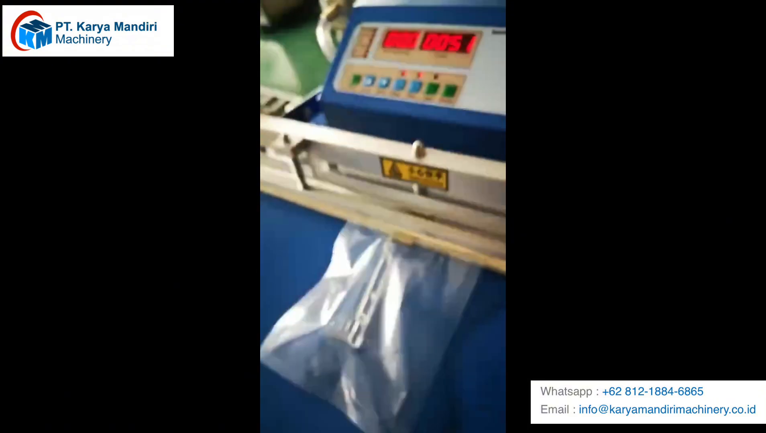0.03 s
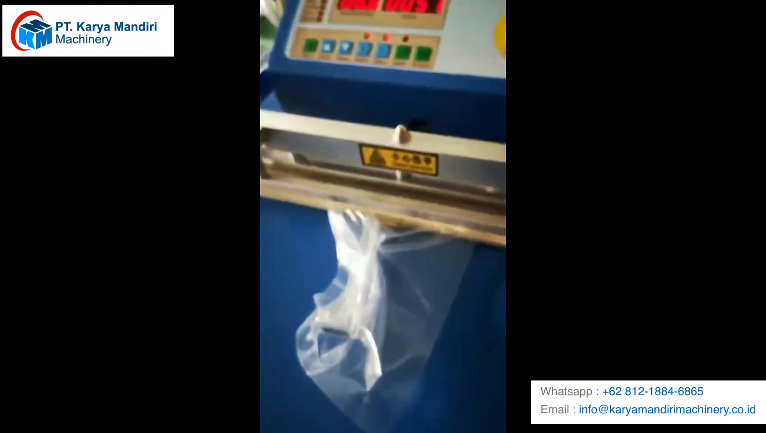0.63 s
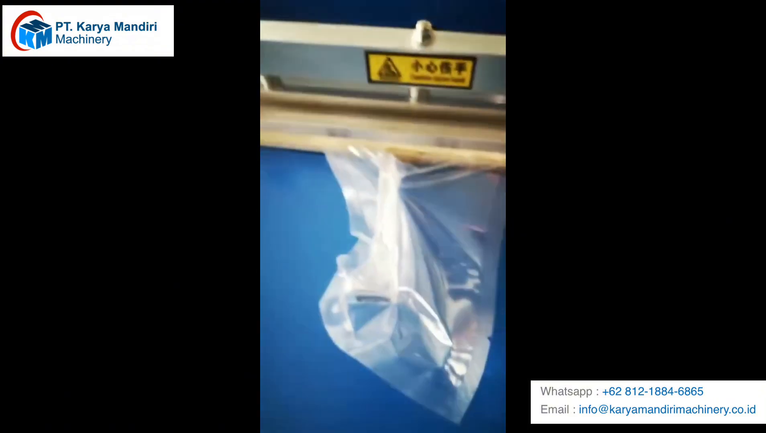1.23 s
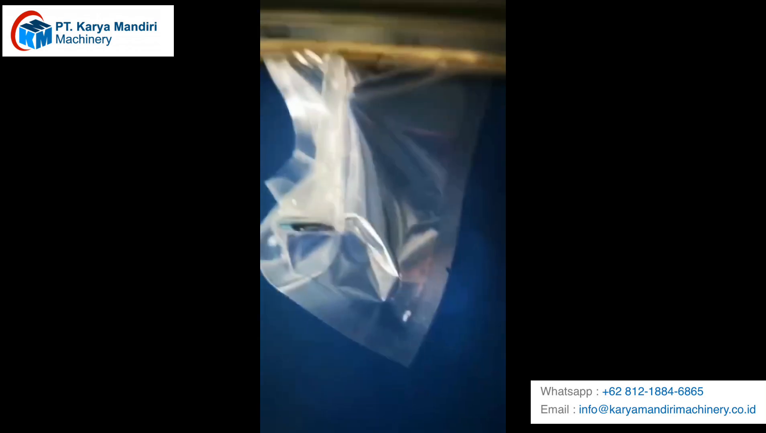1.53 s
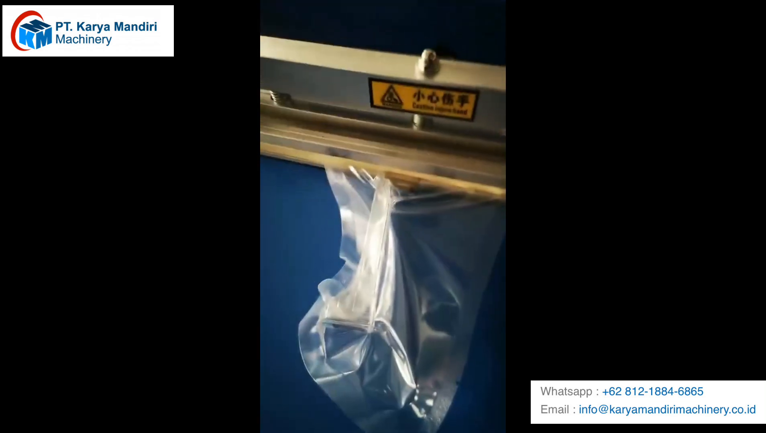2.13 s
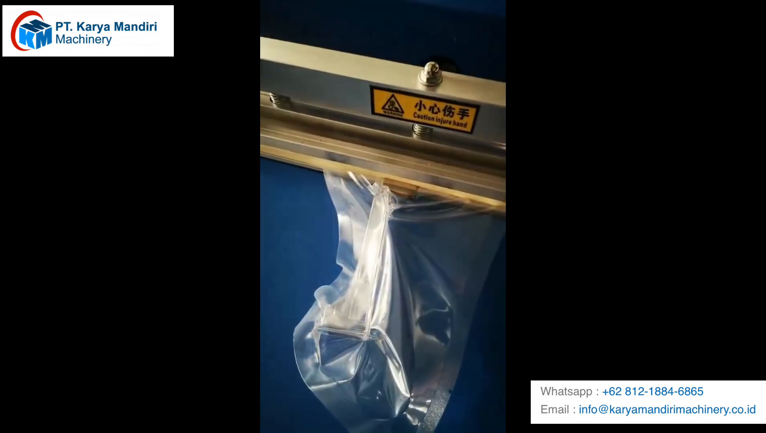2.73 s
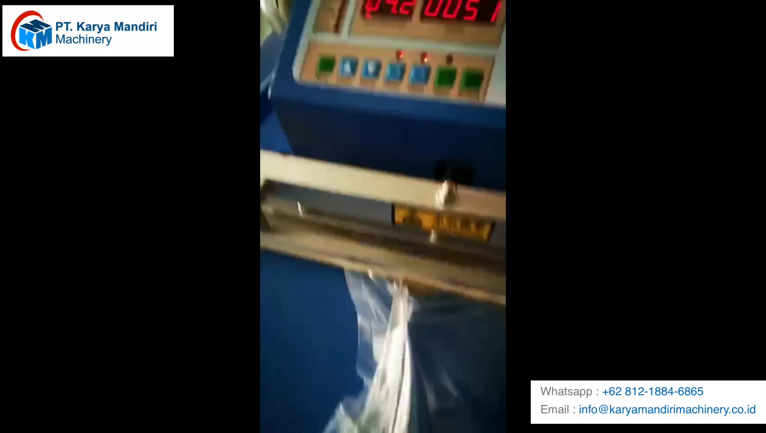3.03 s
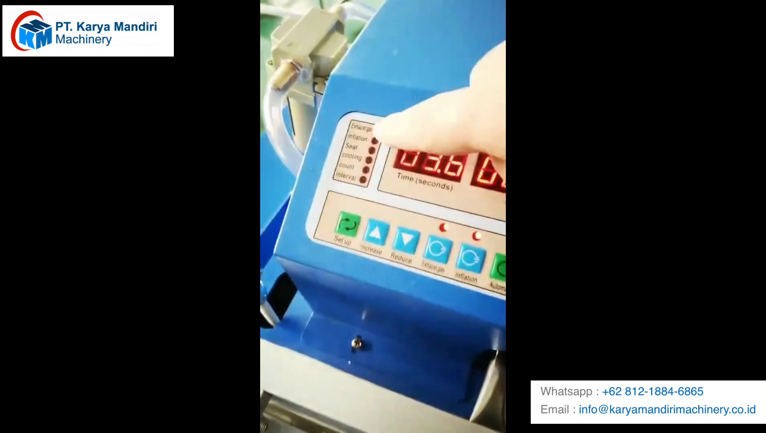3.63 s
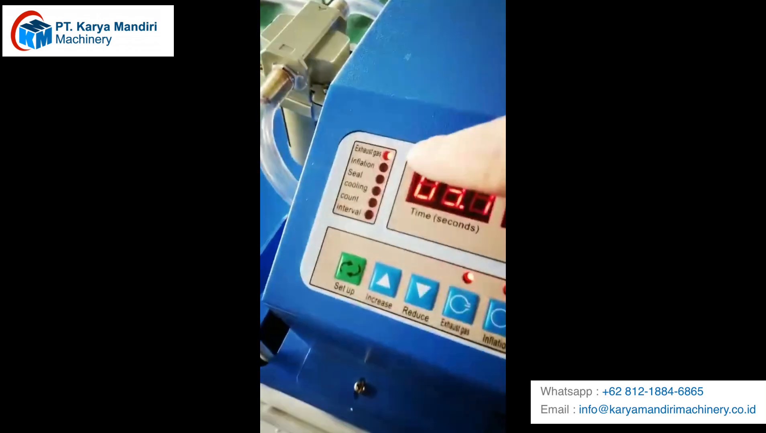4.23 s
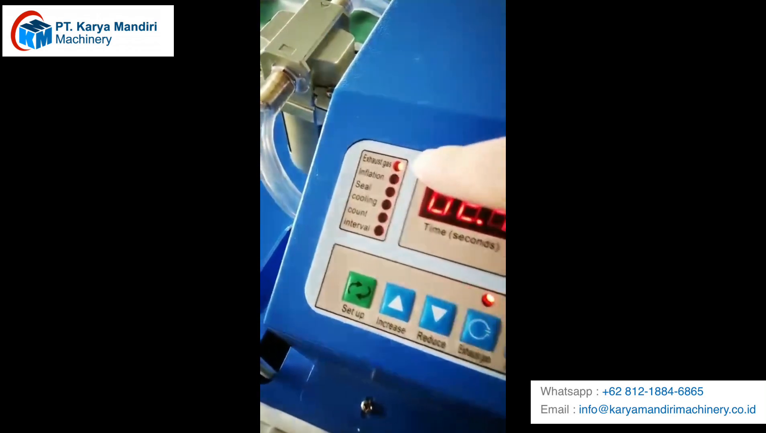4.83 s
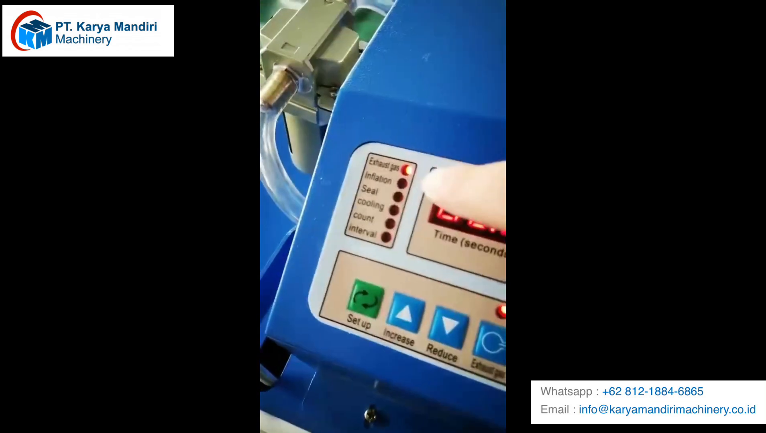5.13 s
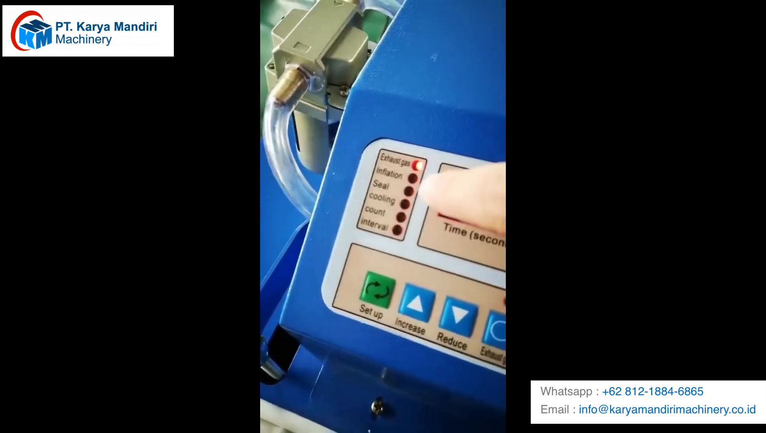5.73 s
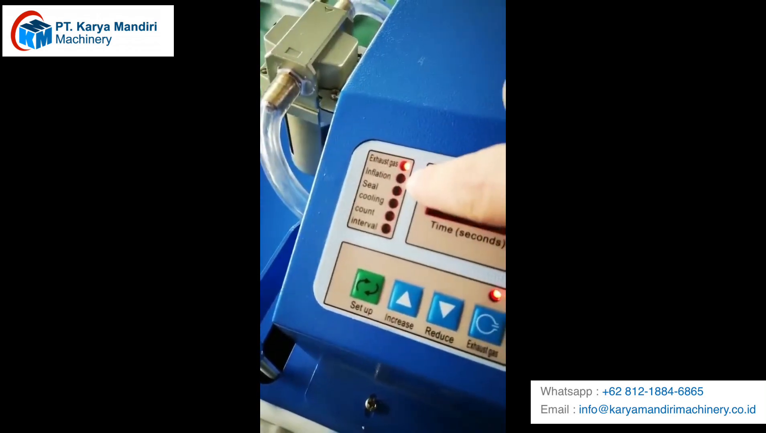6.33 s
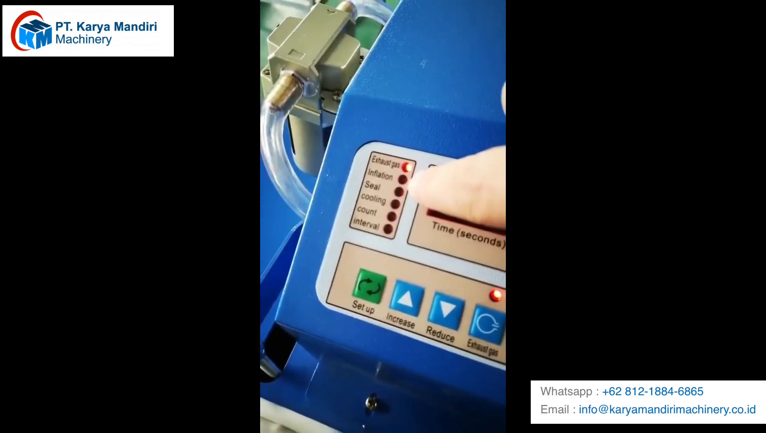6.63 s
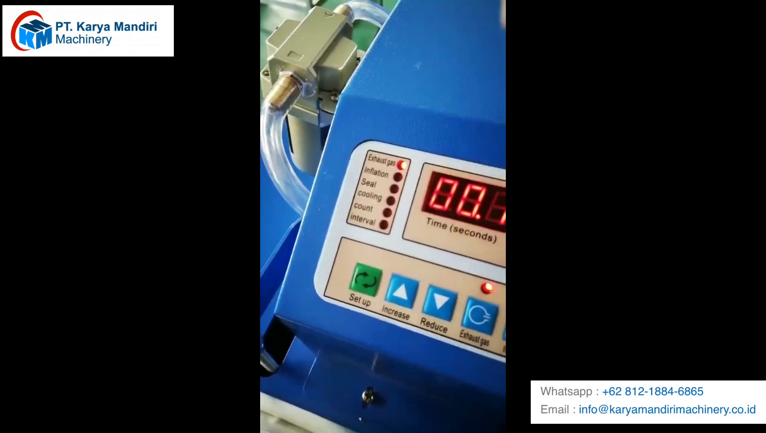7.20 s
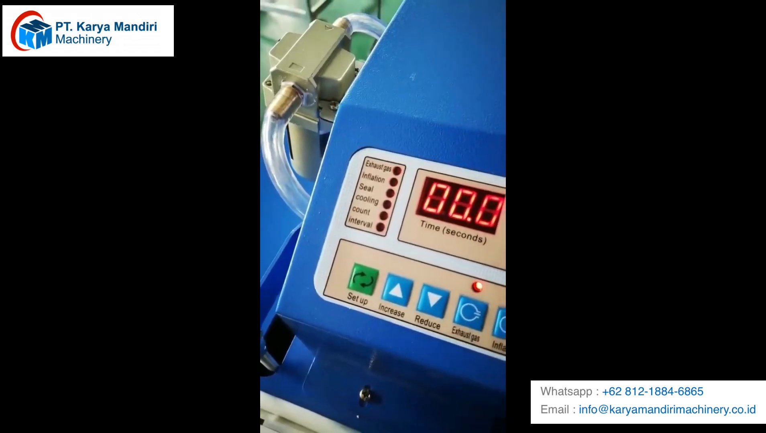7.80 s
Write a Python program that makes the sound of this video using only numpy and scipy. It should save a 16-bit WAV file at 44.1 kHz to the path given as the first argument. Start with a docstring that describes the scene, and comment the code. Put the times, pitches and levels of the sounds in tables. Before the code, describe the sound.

A vacuum sealer's pump hums low and steady throughout, heard close and in mono in a workshop. At about 0.2 seconds the metal jaw clunks shut and a plastic bag crumples in a rush of air, creaking briefly and snapping tight, with the sharpest snap near 1 second and a few faint ticks until about 2 seconds. Meanwhile air hisses softly through the nozzle with a faint, high, wavering whistle that briefly rasps near 2.8 seconds. Between 2.5 and 4 seconds the microphone moves, and the hiss turns fuller, brighter and slightly phasey. It sags a little after 6 seconds. At about 7 seconds the suction ends as valves blow off in several sharp blasts with metallic knocks. The pneumatic jaw then travels with soft puffs, a rumble and a run of clacks, adding a short low groan from 7.5 to 7.9 seconds.

```python
"""Vacuum sealer in a workshop

A nozzle sealer in mono, the microphone a hand's length away. The pump hums throughout.
The jaw shuts; the plastic bag collapses, creaks and snaps tight. Air hisses and whistles through
the nozzle while the microphone moves from beside the bag to above the panel.
At the end the valves blow off, the pneumatic jaw travels with a groan, and its linkage clacks."""
import sys
import numpy as np
from scipy import signal
from scipy.fft import rfft, irfft
from scipy.io import wavfile
from scipy.ndimage import uniform_filter1d, map_coordinates

SR = 44100
rng = np.random.default_rng(int(sys.argv[2]) if len(sys.argv) > 2 else 0)


def pcm_store(signal):
    """Save signal as 16-bit PCM."""
    levels = np.round(np.clip(np.atleast_2d(signal), -1, 1) * 32767)
    wavfile.write(sys.argv[1], SR, levels.astype(np.int16).T)


N = 351036
TIME = np.arange(N) / SR
FREQ = np.maximum(np.fft.rfftfreq(N, 1 / SR), 1)
EMPTY_S = 6.04  # the bag runs out of air


def undb(db):
    """Decibels to gain."""
    return np.exp(np.log(10) / 20 * np.asarray(db))


def unit(x):
    """Scale to rms 1."""
    return x / np.sqrt(np.mean(x ** 2))


def colour(points):
    """Gain over frequency from (f/Hz, level/dB) points, falling off below the first."""
    hz, db = np.transpose(points)
    return undb(np.interp(np.log(FREQ), np.log(hz), db)) * np.minimum(FREQ / hz[0], 1) ** 2


def resonances(rows):
    """Gain over frequency of (f/Hz, width/Hz, level/dB) peaks."""
    return sum(undb(db) / (1 + (2 * (FREQ - hz) / width) ** 2) for hz, width, db in rows)


def noise(gain, grain_db=0):
    """Turbulence of rms 1 in a given colour; grain makes it crackle."""
    grains = undb(grain_db * np.repeat(rng.standard_normal(N // 32 + 1), 32)[:N])
    return unit(irfft(rfft(rng.standard_normal(N) * grains) * gain, N))


def walk(rate_hz):
    """Smooth random drift of rms 1."""
    hold = max(int(SR / rate_hz), 1)
    steps = np.repeat(rng.standard_normal(N // hold + 1), hold)
    return unit(uniform_filter1d(uniform_filter1d(steps, hold), hold)[:N])


def sine(cycles):
    """Sine with a random starting phase."""
    return np.sin(2 * np.pi * (cycles + rng.random()))


def fade(t, t60):
    """Exponential decay by 60 dB in t60 seconds."""
    return np.exp(-np.log(1000) * np.maximum(t, 0) / t60)


def gate(start, length, t60, rise=0.0028):
    """Open, hold until start + length, then die away; times in seconds."""
    return np.clip((TIME - start) / rise, 0, 1) * fade(TIME - start - length, t60)


def swells(rows):
    """Joint envelope of (t/s, rise/s, hold/s, level/dB, t60/s) swells, whose powers add."""
    return np.sqrt(sum((undb(db) * gate(s, rise + hold, t60, rise)) ** 2
                       for s, rise, hold, db, t60 in rows))


def bell(peak_s, before_s, after_s):
    """Lopsided bell curve that reaches 1 at peak_s."""
    return np.exp(-.5 * ((TIME - peak_s) / np.where(TIME < peak_s, before_s, after_s)) ** 2)


def glide(x, ratio):
    """Move all resonances of a sound by a changing pitch ratio."""
    return map_coordinates(x, [np.cumsum(ratio) % (N - 1)], order=3, mode="nearest")


def strikes(rows, modes, scatter, crack, crack_t60, neutral_hz, lean):
    """Short blows that crack and ring a set of modes; brighter blows favour the upper modes."""
    track, t = np.zeros(N + SR), np.arange(SR // 20) / SR
    hz, db, t60 = np.transpose(modes)[:, :, None]
    for s, peak_db, bright_hz in rows:
        detuned = hz * (1 + scatter * rng.standard_normal(hz.shape))
        weight = undb(db) * (hz / neutral_hz) ** (lean * np.log2(bright_hz / neutral_hz))
        phase = 2 * np.pi * (detuned * t + rng.random(hz.shape))
        ring = np.sum(weight * fade(t, t60) * np.sin(phase), axis=0)
        burst = np.convolve(rng.standard_normal(len(t)), [1, 1, -1, -1], "same") / 2
        hit = ring / np.abs(ring).max() + crack * burst * fade(t, crack_t60)
        hit *= np.minimum(t / 0.0007, 1)
        track[int(s * SR):][:len(t)] += undb(peak_db) * hit / np.abs(hit).max()
    return track[:N]


def at_panel():
    """Microphone position: 0 beside the bag, 1 above the panel."""
    leave_s, arrive_s = 2.38, 3.86
    return np.clip((TIME - leave_s) / (arrive_s - leave_s), 0, 1)


def room(x, wet_db, band_hz, t60_mid, t60_high):
    """Add diffuse reflections off the machine and the workshop, whose treble dies first."""
    t = np.arange(SR // 2) / SR
    white = rng.standard_normal(len(t))
    mids = signal.sosfilt(signal.butter(2, band_hz, "band", fs=SR, output="sos"), white)
    treble = .1 * np.diff(white, prepend=0)
    tail = (mids * fade(t, t60_mid) + treble * fade(t, t60_high)) * (t > .005)
    return x + undb(wet_db) * signal.fftconvolve(x, tail / np.sqrt(np.sum(tail ** 2)))[:N]


def pump():
    """Shaft and vane lines waver over a low rumble; the vanes labour as the bag goes tight."""
    # pump lines: multiple of the shaft rate, relative level/dB at the bag, the same at the panel
    lines = [(1, -59, -58), (2, -49, -48), (4, -59, -57.5), (6, -55, -50.5), (8, -57, -58), (10, -70, -71),
             (23, -84, -73), (25, -84, -74), (26, -72, -69), (28, -84, -77), (35, -86, -78), (36, -81, -76),
             (38, -84, -76)]
    # spectrum of the pump and room rumble: f/Hz, relative level/dB
    rumble = [(14, 4), (30, -0.5), (65, 3.5), (90, -6), (125, -5), (160, -9.5), (210, -11), (270, -13.5),
              (340, -18), (440, -34), (650, -54), (1100, -110)]
    shaft_hz, vanes = 24.22, 8
    turns = shaft_hz * (TIME + np.cumsum(.0005 * walk(2)) / SR)
    moved, load_db = at_panel(), 7 * bell(0.76, 0.19, 0.34)
    hum = 0
    for k, bag_db, panel_db in lines:
        db = bag_db + moved * (panel_db - bag_db) + load_db * (k == vanes)
        hum += undb(db + 0.24 * walk(4.15)) * sine(k * turns)
    return 1.28 * hum + undb(-49 + 0.44 * moved) * noise(colour(rumble))


def hiss():
    """Broad hiss of the air drawn in, changing colour as the microphone moves."""
    # spectrum beside the bag: f/Hz, relative level/dB
    bag_colour = [(450, -15), (850, -13), (1400, -14.5), (2050, -1), (2560, -8.5), (2740, -3.5),
                  (2950, -10), (3300, -9.5), (4070, -1.5), (4800, -7.5), (6400, -9.5), (7900, -5.5),
                  (10300, -9), (12000, -16.5)]
    # spectrum above the panel: f/Hz, relative level/dB
    panel_colour = [(450, -10), (620, -7), (850, -9.5), (1350, -6.5), (2050, -0.5), (2480, -3.5),
                    (2740, -2), (3100, -0.5), (3750, 0.5), (4900, -3.5), (5750, 0.5), (6350, -4.5),
                    (9600, -2), (12000, -9.5)]
    moved = at_panel()
    beside_bag = undb(-48.5) * np.sqrt(1 - moved) * noise(colour(bag_colour))
    return beside_bag + undb(-47.5) * moved * noise(colour(panel_colour))


def whistle():
    """The nozzle whistles faintly, surges as folds of film open, and once breaks into a rasp."""
    # pitch of the nozzle: t/s, f/Hz
    pitch_path = [(.9, 4130), (1.16, 4020), (1.3, 4140), (1.6, 4120), (2.05, 4010), (2.62, 4000),
                  (2.72, 4250), (2.86, 4060), (2.98, 4220), (3.13, 4050), (4.4, 3970), (4.8, 4120),
                  (6.8, 4010)]
    # surges of the flow: t/s, rise/s, width/Hz, level/dB, t60/s
    flow_surges = [(.45, 0.072, 150, -53.5, 6.4), (1.08, 0.089, 190, -47, 3.2), (1.28, 0.12, 260, -50, 2.7),
                   (2.66, 0.029, 130, -53, 1.5), (3.05, 0.15, 170, -48, 5.7), (3.5, 0.6, 750, -54.5, 4),
                   (4.6, .2, 500, -57, 5)]
    times, hz = np.transpose(pitch_path)
    centre = np.mean(hz)
    surges = sum(swells([(s, rise, 0, db, t60)]) * noise(resonances([(centre, width, 0)]))
                 for s, rise, width, db, t60 in flow_surges)
    steady = undb(-59) * noise(resonances([(centre, 200, 0)]))
    rasp = swells([(2.81, .04, .06, -49, .6)]) * noise(resonances([(centre, 1300, 0)]))
    pitch = np.interp(TIME, times, hz) * (1 + .004 * walk(4))
    shift = np.exp(2j * np.pi * np.cumsum(pitch - centre) / SR)  # carries the bands along the pitch
    flutter = undb(1.4 * walk(40))
    return np.real(signal.hilbert(steady + surges + rasp) * shift) * flutter


def off_casing(air):
    """A reflection off the casing hollows the hiss, most as the microphone passes over it."""
    # band that drops out there: f/Hz, width/Hz, level/dB of the part cancelled
    hollow = [(3150, 240, -.5)]
    overhead, delay_s = bell(2.95, 0.55, 0.55), .000625
    air = air - overhead * irfft(rfft(air) * resonances(hollow), N)
    strength = 0.07 + 0.13 * overhead
    return (air - strength * np.roll(air, int(delay_s * SR))) / np.sqrt(1 + strength ** 2)


def off_panel(air):
    """Short reflections give the hiss a phasey colour above the panel; their delays step once."""
    # panel reflections: first delay/ms, last delay/ms, gain
    paths = [(.99, 1.05, .15), (1.57, 1.5, .14), (2.93, 3.05, .11)]
    step_s, echoes = 3.56, 0
    for first_ms, last_ms, gain in paths:
        delay_s = np.where(TIME < step_s, first_ms, last_ms) / 1000
        echoes += gain * np.interp(TIME - delay_s, TIME, air)
    return air + at_panel() * echoes


def jet():
    """The valve jet beams its treble in narrow lobes, drifting in pitch as the microphone crosses."""
    # lobes: peak t/s, entry/s, exit/s, f/Hz, width/Hz, drift/(Hz/s), level/dB
    lobes = [(3.25, 0.37, 0.29, 10930, 600, -150, -58), (3.749, 0.4, 0.59, 8080, 480, -380, -55.5),
             (4.649, 0.43, 0.41, 8820, 400, -69.5, -50), (4.802, 1.2, 1.1, 9510, 650, -88.5, -50.5),
             (5.0, 0.53, 1.54, 9920, 380, -1.5, -56.5)]
    treble = 0
    for s, enter, leave, hz, width, drift, db in lobes:
        band = noise(resonances([(hz, width, 0)]))
        ratio = 1 + drift / hz * np.clip(TIME - s, -1, 1)
        treble += undb(db) * bell(s, enter, leave) * glide(band, ratio)
    return treble


def sizzle():
    """Air sizzles through the creases of the film."""
    # spells of sizzling: t/s, rise/s, hold/s, level/dB, t60/s
    spells = [(.4, 0.029, 0.3, -51, 0.85), (1.12, 0.08, 0.38, -52, 0.23)]
    # resonances of the creases: f/Hz, width/Hz, relative level/dB
    creases = [(5600, 1100, -2), (8340, 3200, 0)]
    return swells(spells) * noise(resonances(creases), grain_db=5.5)


def suction():
    """The nozzle draws air until the valves switch; the sound sags as the bag runs empty."""
    air = off_panel(off_casing(hiss() + whistle())) + sizzle() + jet()
    sag_db = -4 * np.maximum(TIME - EMPTY_S, 0)
    return air * undb(sag_db) * gate(start=.16, length=6.9, t60=.3, rise=0.034)


def crumple():
    """The bag crumples as the air rushes out of it."""
    # rushes of air: t/s, rise/s, hold/s, level/dB, t60/s
    rushes = [(-.01, 0.015, 0.026, -39.5, 1), (.163, 0.0048, 0.018, -26, 0.11),
              (.17, 0.018, 0.11, -31.5, 0.98), (.72, 0.15, .04, -44.5, 0.9)]
    # spectrum of the crumpling film: f/Hz, relative level/dB
    spectrum = [(120, -18), (210, 6), (340, -7.5), (463, -10.5), (540, -20.5), (850, -7.5), (1210, -7.5),
                (1670, -6.5), (2800, -6.5), (3620, -9.5), (4500, -8.5), (7180, -12), (10300, -16.5),
                (12500, -31)]
    return swells(rushes) * noise(colour(spectrum), grain_db=3.0)


def snaps():
    """The film snaps tight and rings briefly."""
    # snaps: t/s, peak level/dB, brightness f/Hz
    hits = [(0.0054, -17, 2200), (0.021, -22, 2840), (0.0267, -22, 1850), (0.0567, -14, 3420),
            (0.1038, -23, 1700), (0.1171, -21, 1680), (0.1497, -15, 2470), (0.2495, -12, 1680),
            (.2572, -18, 1700), (0.3088, -11, 1600), (0.4431, -21, 2950), (0.457, -12, 2340),
            (0.4773, -16.5, 3600), (0.5057, -14, 3420), (0.5237, -25, 1880), (.868, -36, 4200),
            (.939, -32, 4500), (0.9605, -7.5, 3230), (1.271, -33, 4200), (1.5515, -33, 3860),
            (1.734, -30.5, 4110), (2.1805, -30, 4030)]
    # modes of the taut film: f/Hz, relative level/dB, t60/s
    modes = [(1120, -18, 0.019), (1646, -1.5, 0.025), (2040, 3, 0.01), (2510, -0.5, 0.015),
             (3184, 0.5, 0.016), (4500, 9, 0.0048), (5580, -3, 0.016), (6460, -9, 0.017), (7370, 2, 0.0066),
             (9230, -4.5, 0.011)]
    return strikes(hits, modes, scatter=0.074, crack=0.037, crack_t60=0.012, neutral_hz=3120, lean=1.0)


def creak():
    """The film sticks and slips over the jaw: a squeak when fast, single ticks as the slips slow."""
    # creaks: t/s, length/s, first slip rate/Hz, last slip rate/Hz, relative level/dB
    creaks = [(0.245, 0.038, 900, 945, -25.5), (0.335, 0.11, 462, 100, -21)]
    # modes of the film where it rubs: f/Hz, relative level/dB, t60/s
    modes = [(1800, -1.5, .014), (2230, -1, .012), (2710, .8, .016), (5200, -16, .003), (8500, -13, .002)]
    slips, ease_db = 0, 12.5
    for s, length, first, last, db in creaks:
        progress = np.clip((TIME - s) / length, 0, 1)
        bend = .5 - .5 * np.cos(np.pi * progress ** 1.85)  # the rate holds at first, then glides
        rate = first * (last / first) ** bend * (1 + .03 * walk(200))
        pulses = np.diff(np.floor(np.cumsum(rate) / SR), prepend=0)
        envelope = undb(db - ease_db * progress ** 2) * gate(s, length, t60=0.026, rise=0.05)
        slips += pulses * envelope / np.sqrt(first / SR)
    t = np.arange(SR // 50) / SR
    # neighbouring modes swing in opposite senses, so little is radiated outside their band
    ring = sum((-1) ** k * undb(db) * fade(t, t60) * np.sin(2 * np.pi * hz * t)
               for k, (hz, db, t60) in enumerate(modes))
    tone = signal.fftconvolve(slips * undb(walk(300)), ring)[:N] / np.sqrt(np.sum(ring ** 2))
    return signal.sosfilt(signal.butter(2, 1400, "high", fs=SR, output="sos"), tone)


def valves():
    """The valve seat rings, and air blows off in blasts through the resonant block."""
    # blasts: t/s, length/s, level/dB, t60/s, tilt/(dB/octave)
    blasts = [(7.054, 0.006, -22, 0.042, 9.5), (7.062, 0.012, -26.5, 0.15, 1.5),
              (7.096, 0.0047, -17.5, 0.0099, 2.5), (7.1, 0.11, -24.5, 0.076, 3),
              (7.14, 0.064, -26.5, 0.058, 6), (7.215, 0.037, -22.5, 0.12, 2),
              (7.344, 0.0046, -35.5, 0.07, 6), (7.814, 0.0046, -37, 0.24, 12)]
    # spectrum of the blasts before their tilt: f/Hz, relative level/dB
    spectrum = [(88, -20), (150, 11), (280, 8.5), (480, -7.5), (650, -2), (856, -7), (1050, -3), (1380, -2),
                (1660, -4), (2530, -2), (3400, -4.5), (3950, -9), (4800, -6), (9630, -12.5), (11500, -27.5),
                (15600, -50)]
    # ring of the seat at the first blast: f/Hz, level/dB
    seat_modes = [(1290, -33), (1800, -25), (1950, -27)]
    # resonances of the valve block: f/Hz, relative level/dB
    block_modes = [(1050, -2), (1362, 1), (2600, 2), (3090, -1), (4425, 0), (4970, 1), (5220, 1), (7650, 0)]
    seat = gate(blasts[0][0], 0, t60=0.066) * sum(undb(db) * sine(hz * TIME) for hz, db in seat_modes)
    block = resonances([(hz, 110, db) for hz, db in block_modes])
    gain = colour(spectrum) * (1.6 + block)
    air = sum(undb(db) * gate(s, length, t60) * noise(gain * undb(tilt * np.log2(FREQ)), grain_db=1.0)
              for s, length, db, t60, tilt in blasts)
    return seat + air * undb(1.4 * walk(160))


def vent():
    """The cylinder vents in soft puffs while the jaw travels."""
    # puffs: t/s, rise/s, hold/s, level/dB, t60/s
    puffs = [(7.25, 0.079, 0.059, -35.5, 0.84), (7.435, 0.0041, 0.047, -34.5, 0.17),
             (7.5, 0.065, 0.18, -49.5, 1), (7.8, 0.0049, 0.014, -48, 0.96)]
    # spectrum of the vented air: f/Hz, relative level/dB
    spectrum = [(210, -27), (350, 4.5), (605, -13.5), (766, -7), (1540, -7.5), (2030, -8.5), (2690, -9.5),
                (3270, -13.5), (7480, -19.5), (12500, -39)]
    return swells(puffs) * undb(walk(70)) * noise(colour(spectrum), grain_db=2.5)


def shudder():
    """The frame rumbles while the jaw settles and while it travels."""
    # movements of the jaw: t/s, rise/s, hold/s, level/dB, t60/s
    travels = [(.17, .02, .05, -43, 1.1), (7.29, 0.15, 0.13, -36, 1.5), (7.81, 0.017, 0.061, -43.5, 0.25)]
    # resonances of the frame: f/Hz, width/Hz, relative level/dB
    frame = [(109, 38, 1.5), (203, 79, -3.5), (315, 79, -8.5), (478, 17, -21)]
    return swells(travels) * noise(resonances(frame))


def groan():
    """The piston seal drags with a firm tone, whose pitch and strength follow the pull of the jaw."""
    # course of the groan: t/s, f/Hz, relative level/dB
    course = [(7.49, 101, -35), (7.53, 101, -34), (7.57, 108.3, -32.5), (7.695, 106.7, -35),
              (7.735, 99.5, -32), (7.775, 101, -37), (7.815, 101.4, -28.5), (7.848, 101.5, -32)]
    # partials of the seal: multiple of the pitch, relative level/dB
    partials = [(1, -5), (2, -13), (3, -1), (4, -28)]
    times, hz, db = np.transpose(course)
    pitch = np.interp(TIME, times, hz) * (1 + .008 * walk(60))
    phase = 2 * np.pi * np.cumsum(pitch) / SR
    tone = sum(undb(level + 1.1 * walk(35)) * np.sin(k * phase) for k, level in partials)
    dragging = gate(times[0], times[-1] - times[0], t60=0.047, rise=0.021)
    return tone * undb(np.interp(TIME, times, db)) * dragging


def jaw():
    """Each blow on the jaw rings its steel, a little differently in pitch, and thumps the frame."""
    # blows: t/s, ring level/dB, thump level/dB, thump f/Hz
    knocks = [(0, -49, -24.5, 110), (.172, -25.5, -18.5, 182), (0.1925, -28, -20, 178),
              (0.2042, -29, -21, 230), (7.054, -29, -20, 395), (7.101, -23.5, -18, 290),
              (7.127, -44, -25, 159), (7.249, -31, -18.5, 212), (7.339, -52, -22.5, 94),
              (7.43, -33, -25, 110), (7.469, -50, -20, 328)]
    # modes of the steel: f/Hz, relative level/dB on closing, the same on opening
    steel = [(310, -11, -10), (800, -9, -11), (955, -1.5, -9), (1028, -14, -8), (1120, -9, -10),
             (1620, -14, -24), (1808, -14, -10), (2159, -10, -22), (2342, -8, -16), (2590, -13, -7),
             (2698, -11, -10), (3420, -13, -20), (4420, -9, -12), (4969, -16, -9)]
    scatter, thump_cycles = .005, 8.7
    track, t = np.zeros(N + SR), np.arange(SR // 2) / SR
    for s, ring_db, thump_db, thump_hz in knocks:
        ring = 0
        for hz, closing_db, opening_db in steel:
            detuned = hz * (1 + scatter * rng.standard_normal())
            ring += undb(closing_db if s < EMPTY_S else opening_db) * sine(detuned * t)
        thump = fade(t, thump_cycles / thump_hz) * np.sin(2 * np.pi * thump_hz * t)
        blow = undb(ring_db) * ring * fade(t, t60=0.2) + undb(thump_db) * thump
        track[int(s * SR):][:len(t)] += blow * np.minimum(t / 0.0011, 1)
    return track[:N]


def clacks():
    """Valves and linkage clack as the jaw shuts and opens."""
    # clacks: t/s, peak level/dB, brightness f/Hz
    hits = [(.1728, -14.5, 2330), (.1802, -23, 4500), (7.0535, -11.5, 640), (7.0968, -9.5, 3900),
            (7.3452, -19, 4200), (7.4285, -21, 3200), (7.5052, -20, 4600), (7.5655, -27.5, 3680),
            (7.5842, -16.5, 2380), (7.6047, -23, 3350), (7.6509, -25.5, 2210), (7.673, -19.5, 2800),
            (7.8026, -23.5, 4020)]
    # modes of the linkage: f/Hz, relative level/dB, t60/s
    modes = [(1700, 0.5, 0.0083), (2640, 0, 0.027), (3360, 13, 0.0039), (4050, 9.5, 0.015),
             (5490, 4, 0.019), (7950, -3, 0.0085)]
    return strikes(hits, modes, scatter=0.09, crack=0.16, crack_t60=0.02, neutral_hz=4450, lean=1.25)


def scene():
    """All sources at one close microphone, the same in both channels."""
    bag = crumple() + snaps() + creak()
    bag = room(bag, wet_db=-19.5, band_hz=(1500, 3600), t60_mid=.28, t60_high=.17)
    machine = valves() + vent() + shudder() + jaw() + clacks() + groan()
    machine = room(machine, wet_db=-19.0, band_hz=(700, 3950), t60_mid=.26, t60_high=.1)
    mono = pump() + suction() + bag + machine
    return np.array([mono, mono])


def record(dry):
    """The recorder cuts the top steeply."""
    top_hz = 12100
    return signal.sosfilt(signal.ellip(10, .2, 80, top_hz, fs=SR, output="sos"), dry)


dry = scene()
out = record(dry)
pcm_store(out)
```